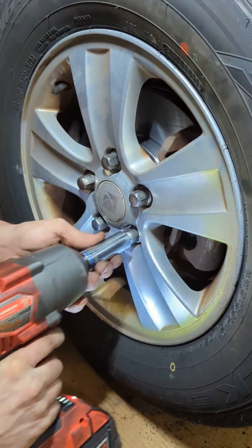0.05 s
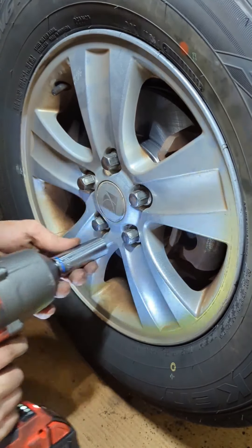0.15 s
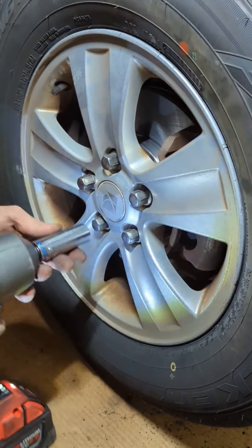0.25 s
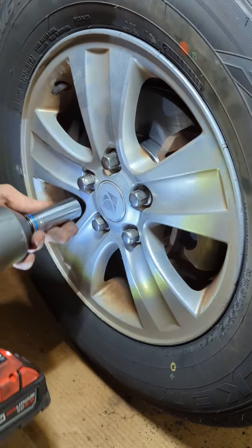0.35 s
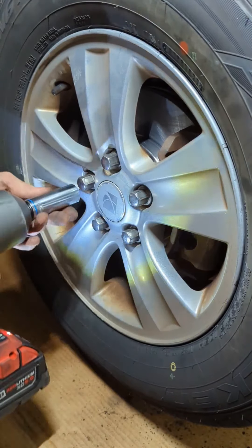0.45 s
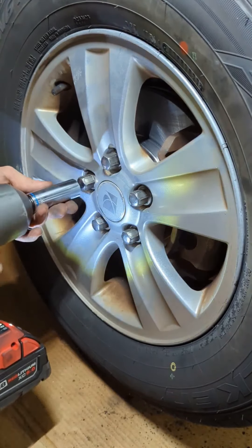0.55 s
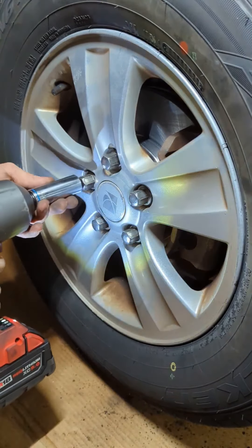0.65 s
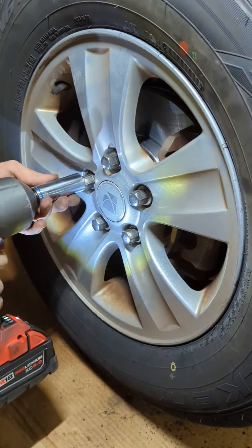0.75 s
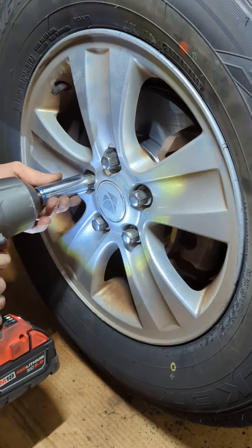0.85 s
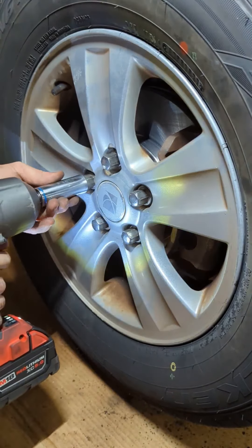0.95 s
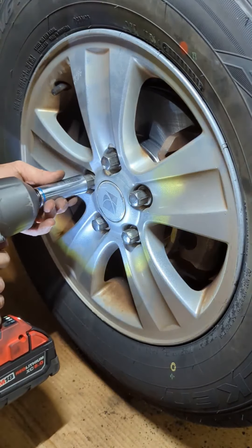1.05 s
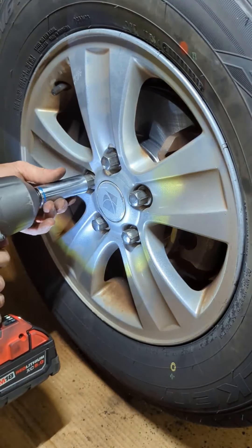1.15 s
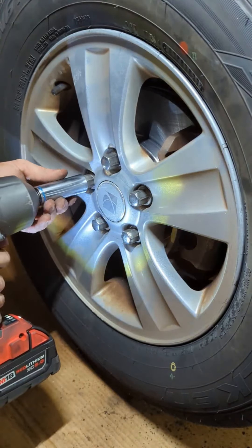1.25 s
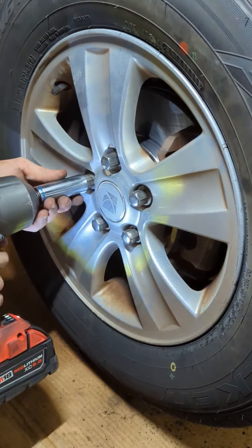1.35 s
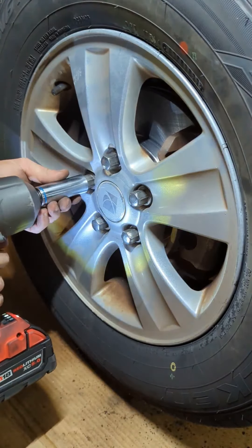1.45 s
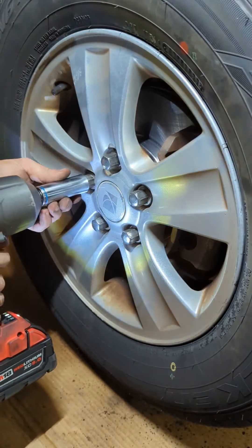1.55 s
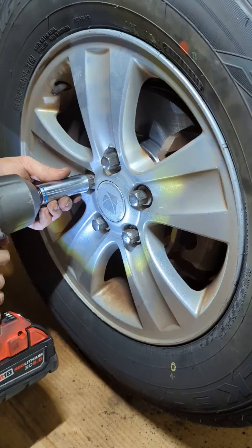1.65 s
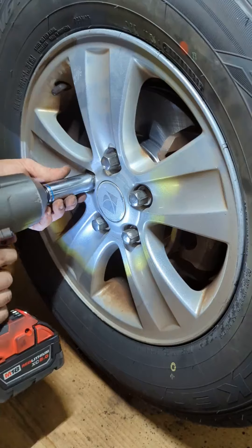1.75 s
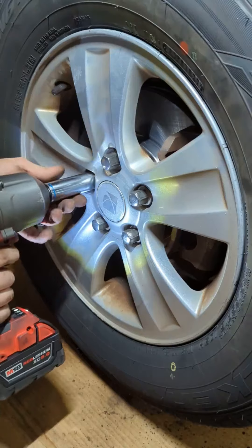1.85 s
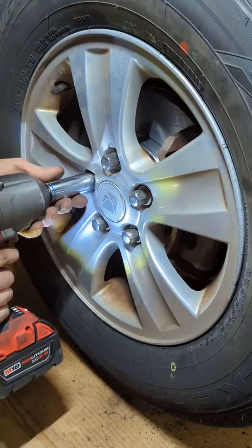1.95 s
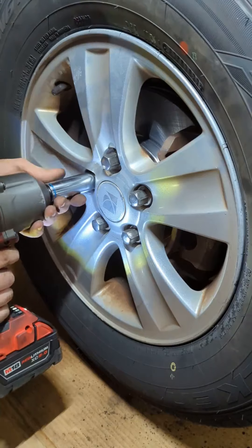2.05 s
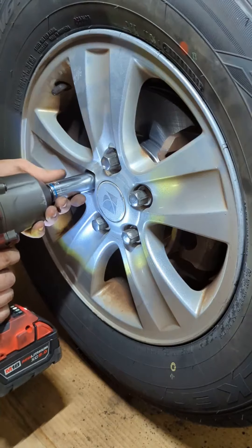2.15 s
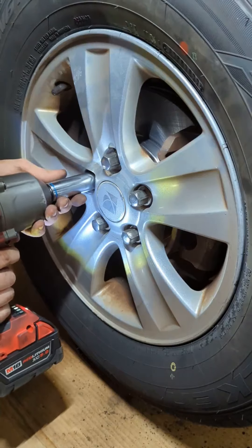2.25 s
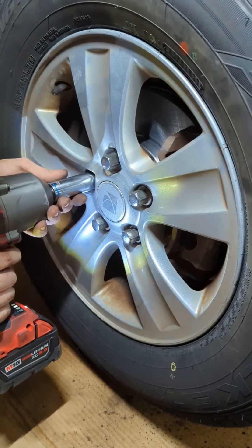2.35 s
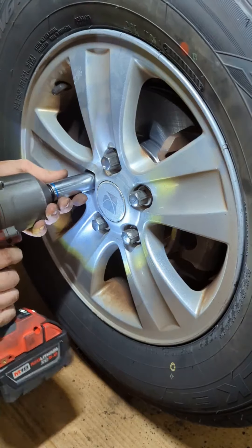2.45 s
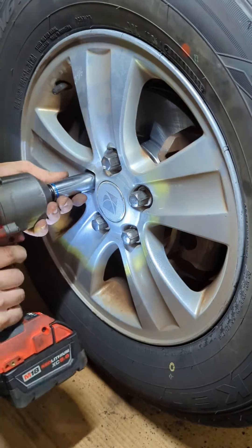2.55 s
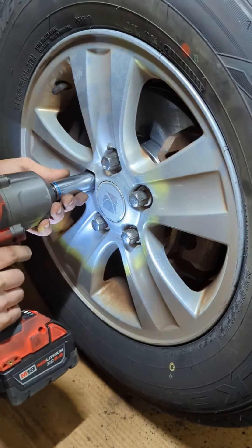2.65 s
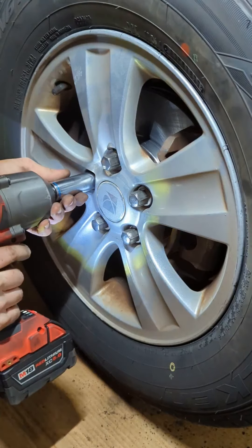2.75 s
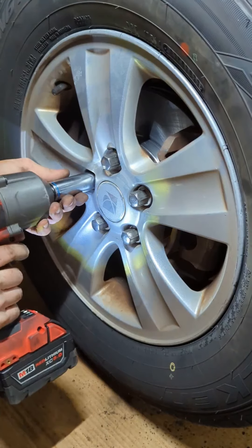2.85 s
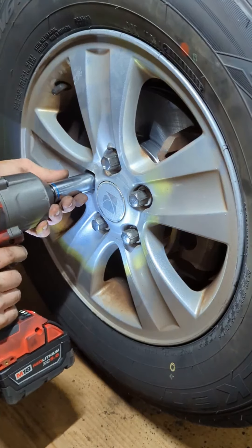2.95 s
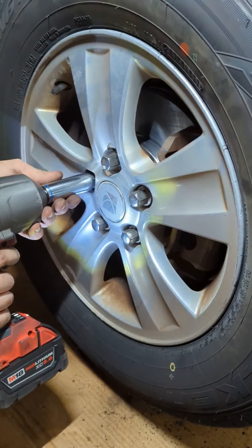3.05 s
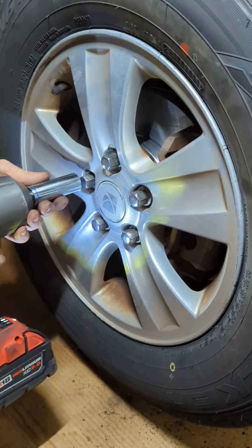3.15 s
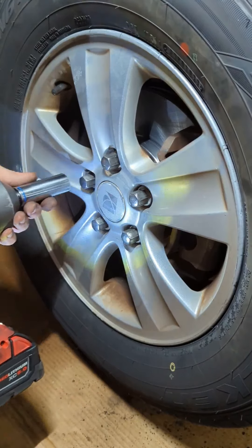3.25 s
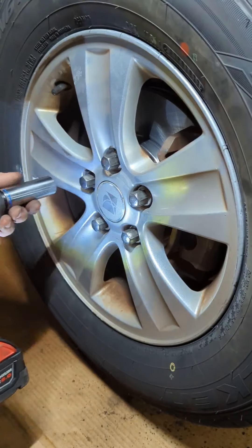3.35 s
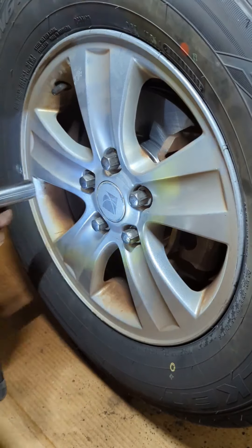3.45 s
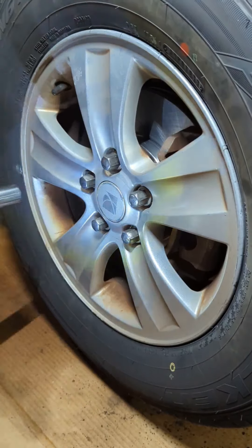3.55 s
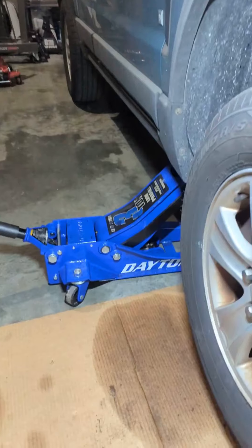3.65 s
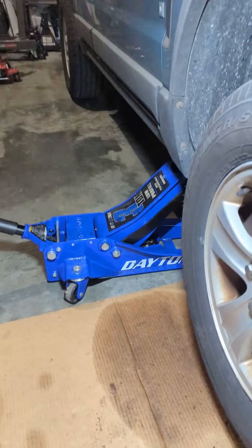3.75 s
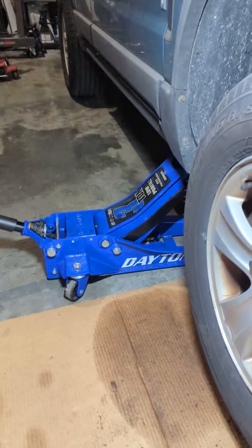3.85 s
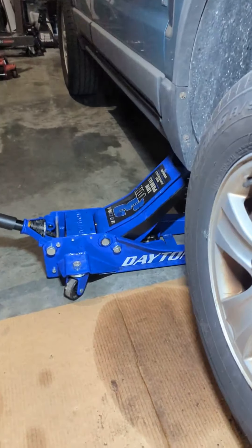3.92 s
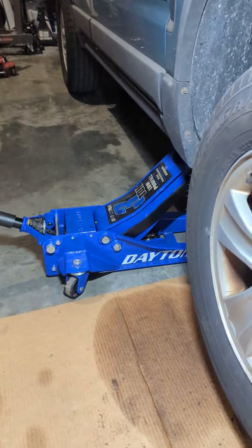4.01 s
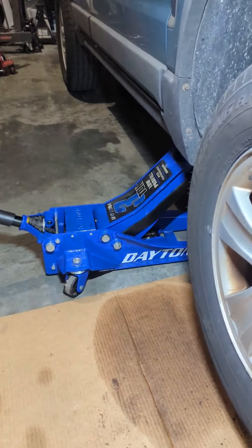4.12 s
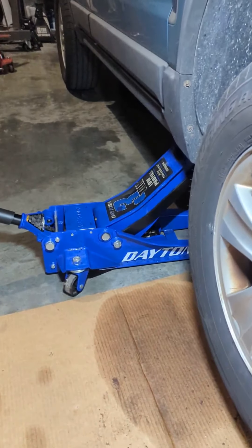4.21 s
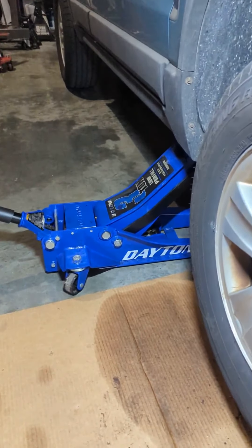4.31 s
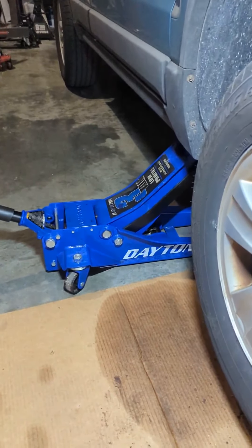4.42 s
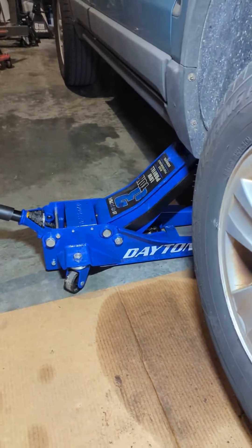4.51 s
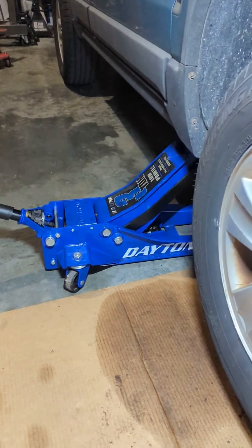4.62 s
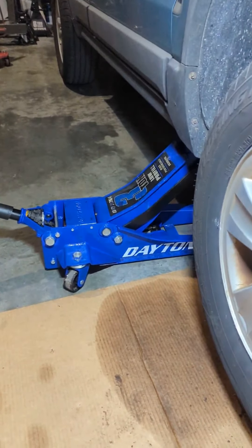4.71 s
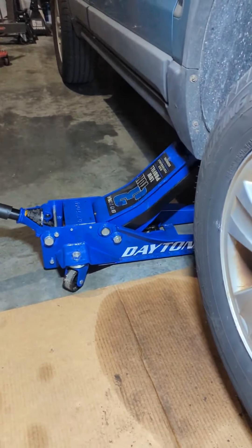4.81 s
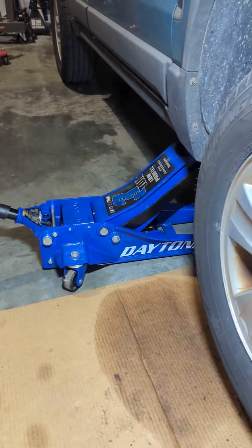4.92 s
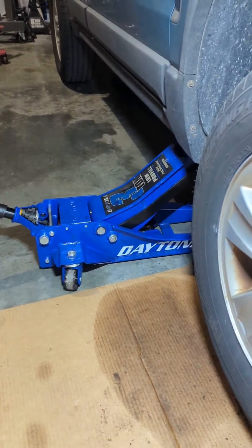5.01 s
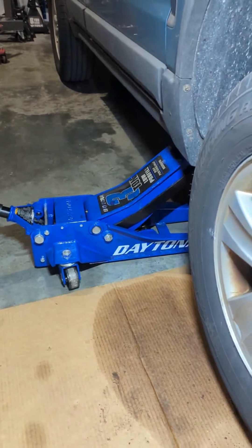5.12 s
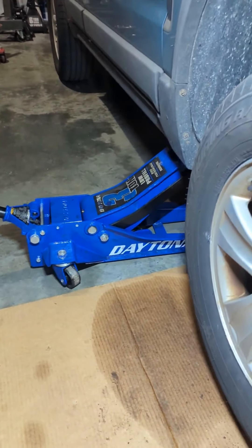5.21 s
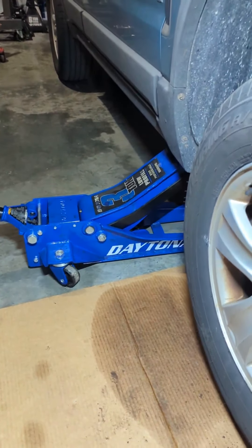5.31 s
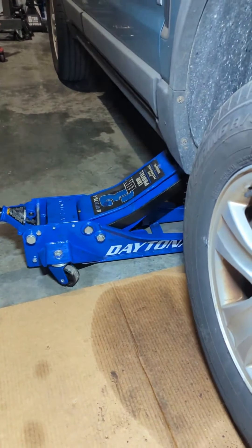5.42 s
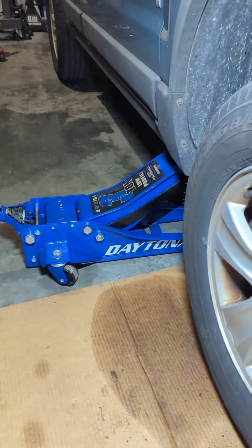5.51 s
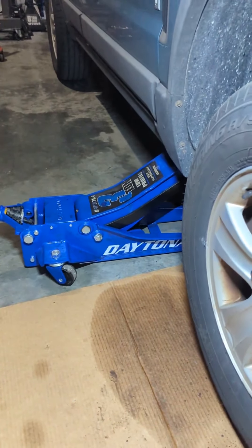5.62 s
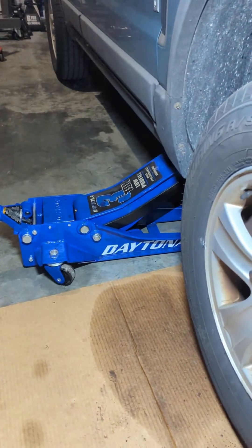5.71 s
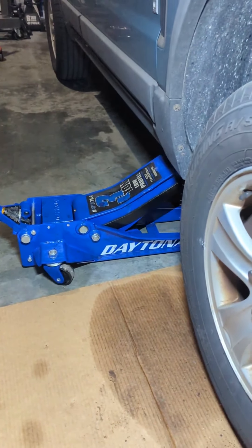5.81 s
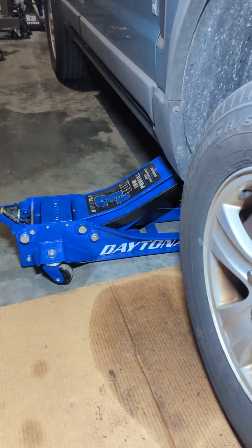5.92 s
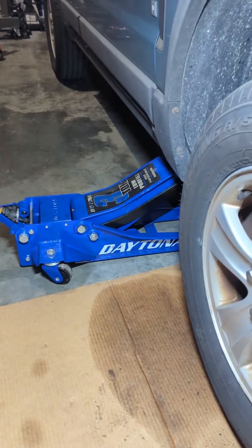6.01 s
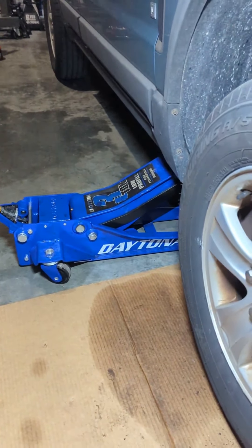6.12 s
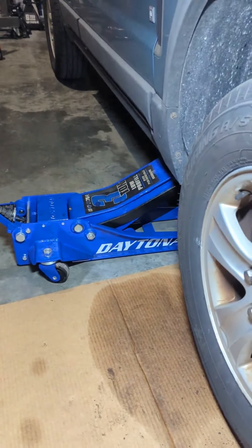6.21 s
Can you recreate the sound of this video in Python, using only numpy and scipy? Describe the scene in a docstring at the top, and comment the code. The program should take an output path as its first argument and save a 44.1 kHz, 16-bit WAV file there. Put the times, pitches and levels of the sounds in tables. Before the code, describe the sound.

Close up in an echoing garage, an impact wrench's rattle fades with socket ticks. After faint touches, a sharp click seats the socket; the motor creeps, whines up fast and brakes into a loud, rapid burst of hammering on the wheel. A muffled tap and a brief dropout follow, then a loud jack clank, a ringing handle knock, scraping and soft low tyre thuds over quiet rumble and hum.

```python
"""In a garage, on two microphones, an impact wrench dies away on one lug nut and is fitted to the next.
Its motor creeps, spins up whining as gear and magnet tones, and is braked; hammer blows ring the wheel.
A finger taps the microphone body, the level drops out briefly and a hollow tone sounds.
A floor jack is released with a hiss, a clank and a scrape, all noise bursts and ringing modes, and the
tyre lands with dull thuds. Rumble, mains hum and a narrow whirr, as noise and sines, run underneath."""
import sys
import numpy as np
from scipy import signal
from scipy.fft import rfft, irfft
from scipy.io import wavfile
from scipy.ndimage import uniform_filter1d

SR = 44100
rng = np.random.default_rng(int(sys.argv[2]) if len(sys.argv) > 2 else 0)


def to_wav(sig):
    """Store sig (one row per channel, or 1-D mono) as 16-bit WAV at the path in sys.argv[1].

    Samples outside -1..1 are clipped; the rate is SR.
    """
    pcm = np.clip(np.atleast_2d(sig), -1, 1) * 32767
    pcm = np.round(pcm).astype(np.int16)
    wavfile.write(sys.argv[1], SR, pcm.T)  # frames by channels


N = 276496
T = np.arange(N) / SR
HZ = np.maximum(np.fft.rfftfreq(N, 1 / SR), 1)

# level_db: dB level of each tone, band or event; some layers add a further gain.
# Gear tones locked to the tooth mesh: mesh_multiple, level_db
GEAR_ORDERS = [(2, -26.5), (5, 0.5), (6, -27.5), (7, -24), (10, -27)]
# Magnet and fan tones: mesh_multiple, slow_level_db, fast_level_db
FIELD_ORDERS = [(.9, -30, -14), (2.32, -22, -11), (3, -30, -1), (3.24, 0, 0), (4, -25, 0), (5.3, -30, -5),
                (5.7, -30, -6), (6.48, -25, -7), (7.22, -25, -9)]
# Switching tone and sidebands: carrier_hz, mesh_multiple_added, slow_level_db, fast_level_db
SWITCHING_TONES = [(8000, 0, -8, -14), (8000, -1.9, 0, -3), (8000, 1.9, -3, -1), (8000, .7, -9, -4),
                   (8000, -1.1, -8, -5), (16000, -4.9, -3, -22), (16000, -2.6, -10, -12)]
# Tool housing resonances, each passed twice: pitch_hz, width_per_pass_hz, level_db
HOUSING_MODES = [(2848, 274, 0), (1696, 500, -23), (4000, 520, -17), (6190, 1200, -25)]
# Spectrum of the gear hiss: pitch_hz, level_db
GEAR_HISS_COLOUR = [(88, -71), (150, -42), (937, -22.5), (1120, -17.5), (1470, -22.5), (1710, -18),
                    (2430, -25.5), (2790, -5), (3200, -20.5), (8640, -34.5), (15200, -43), (15900, -50.5)]
# Motor speed as gear mesh on a light trigger: time_s, mesh_hz
CREEP = [(1.975, 94), (2.08, 119.8), (2.15, 154.8), (2.262, 178.6)]
# Motor layers over speed: creep_level_db, top_level_db, lost_db, loss_time_s
# (after release the level changes by -lost_db in each loss_time_s; a negative quotient is a gain)
WHINE_LEVEL, FIELD_LEVEL = (-71.5, -33, 43, 0.5), (-50, -35.5, 17.5, 0.36)
HISS_LEVEL, SWITCHING_LEVEL = (-50, -24.5, -0.5, 0.3), (-50.5, -44.5, 2.5, -4.5)

# Hammer on anvil: start_s, level_db at 1-4 kHz, highs_level_db
HAMMER_BLOWS = [(2.5389, -5, -24.5), (2.5526, -5, -26.5), (2.5581, -11.5, -17.5), (2.5696, -11.5, -11.5),
                (2.582, -16, -20), (2.594, -11.5, -14), (2.6204, -5.5, -18.5), (2.634, -7, -21.5),
                (2.6445, -11.5, -23), (2.6625, -11.5, -16), (2.6742, -9, -11.5), (2.6947, -7, -15.5),
                (2.7127, -4, -15.5), (2.7287, -12, -17), (2.751, -10.5, -15.5), (2.7756, -13.5, -15.5),
                (2.8, -9, -19.5), (2.82, -16, -22.5), (2.8484, -16.5, -26.5), (2.876, -18, -29.5)]
# Socket on nut: start_s, level_db at 1-4 kHz, lows_level_db, highs_level_db
SOCKET_TOUCHES = [(0.197, -25.5, -67, -43), (0.2173, -22, -56, -32), (0.2319, -24.5, -60, -30),
                  (0.2522, -27, -67, -34), (0.2875, -27.5, -67, -34.5), (0.3058, -26, -67, -39),
                  (0.3603, -37, -54, -66), (0.3741, -39, -58, -67), (0.8701, -38, -33.5, -51),
                  (0.9348, -38.5, -37, -58), (1.2313, -41.5, -37.5, -52), (1.476, -45, -57, -57),
                  (1.6837, -45, -63, -59.5), (1.7573, -55, -61, -51), (1.7864, -33, -63.5, -42),
                  (1.8776, -27, -32.5, -37), (2.02, -39, -50.5, -45), (2.1215, -12.5, -30, -11),
                  (3.1373, -41, -62, -64), (3.1696, -44, -42, -65), (3.4697, -50, -52, -54),
                  (3.5144, -49, -56, -54)]
# Spectrum of a blow on the wheel: pitch_hz, level_db
WHEEL_CRACK_COLOUR = [(35, -48), (60, -23.5), (150, -24), (293, -15), (467, -3.5), (919, -10.5),
                      (1010, -7.5), (2080, 2.5), (2230, -3.5), (4920, -2), (6220, -3.5), (11100, -17),
                      (14700, -15), (15800, -42.5)]
# Ringing of the wheel: pitch_hz, level_db, t60_s
WHEEL_MODES = [(470, -8, .09), (990, -9, .08), (1300, -3, .05), (1560, 0, .05), (1700, -3, .05),
               (1930, -2, .05), (2080, -3, .06), (2380, -4, .05), (2680, -3, .04), (3430, -4, .04),
               (4480, -3, .03), (5400, -6, .025), (6150, -6, .025), (6890, -7, .025)]

# Floor jack and its handle: start_s, level_db at 1-4 kHz, lows_level_db, highs_level_db
JACK_CLANKS, HANDLE_CLANKS = [(4.6137, -51, -77.5, -47.5), (4.7863, -58, -41, -46.5),
                              (4.845, -47, -54, -60), (4.8668, -12.5, -27.5, -14), (5.3946, -51, -68, -32),
                              (5.4245, -38.5, -60, -54), (5.96, -51, -60, -49), (6.0974, -68, -51, -45),
                              (6.1525, -50, -51, -51), (6.186, -52, -67, -43)], [(5.0924, -23.5, -35, -38), (5.1394, -33.5, -41, -61),
                                            (5.1697, -38, -42, -52)]
# Spectrum of a clank: pitch_hz, level_db
JACK_CRACK_COLOUR = [(35, -45), (156, 4), (314, -12.5), (501, 4.5), (650, -4), (1270, -2), (2000, -1.5),
                     (2950, -4.5), (3720, -22.5), (4550, -11), (5100, -21.5), (5930, -15), (6990, -33.5),
                     (8820, -33), (15800, -82)]
# Ringing of the jack and of its handle: pitch_hz, level_db, t60_s
JACK_MODES, HANDLE_MODES = [(913, -6, .15), (1260, -5, .16), (1722, -4, .09), (2200, -5, .1),
                            (2650, -3, .09), (2810, -2, .1), (2920, 0, .1), (3200, -2, .1), (3420, -4, .12),
                            (4450, -8, .12), (4600, -6, .12)], [(1740, -15, 0.17), (1733, -2, 0.27), (1940, 1, 0.072),
                                                (2110, 1.5, .13), (2300, -15, 0.1), (5850, -11, 0.028)]
# Tyre landing and bouncing: start_s, level_db at 1-4 kHz, lows_level_db, highs_level_db
TYRE_THUDS = [(5.47, -54, -41, -62), (5.495, -52, -44, -60), (5.5211, -28.5, -23, -44),
              (5.5602, -21, -26.5, -32), (5.639, -34, -38.5, -38)]
# Spectrum of a thud: pitch_hz, level_db
TYRE_CRACK_COLOUR = [(35, -51), (60, -40), (180, -25), (249, -6), (361, -12), (467, 0.5), (590, -9),
                     (985, -12), (1080, -20), (1720, -11), (1890, -18), (3390, -24), (15800, -51)]
# Ringing of the tyre: pitch_hz, level_db, t60_s
TYRE_MODES = [(220.4, -4, 0.25), (267, -2, 0.21), (416, -14, 0.32), (472, -8, 0.18), (536, -11.5, 0.34),
              (650, -9.5, 0.3)]

# Spells of loose anvil and socket, of sliding and shuffling, and of the jack's release valve:
# start_s, attack_s, hold_s, level_db, sag_db_per_s while held, release_db_per_s
RATTLE_SPELLS, SCRAPE_SPELLS, VALVE_SPELLS = [(0, 0.00067, 0.32, -25.5, 82, 190),
                                              (2.53, 0.0067, 0.0078, -18.5, 301, 2200),
                                              (2.564, .055, 0.13, -19, 3, 140.5),
                                              (2.95, 0.068, 0.17, -59.5, -9, 150)], [(3.38, 0.19, 0.071, -59, 1.4, 110),
                                                              (5.349, 0.012, 0.071, -42.5, 1.5, 171),
                                                              (5.45, 0.14, 0.23, -47.5, 17, 220),
                                                              (5.87, 0.062, 0.19, -66.5, 1.4, 100),
                                                              (6.17, .02, .1, -54, 22, 100)], [(4.772, 0.012, .08, -54.5, -72, 437)]
# Spectra of rattle and scrape: pitch_hz, level_db
RATTLE_COLOUR, SCRAPE_COLOUR = [(24, -48), (64, -17.5), (225, -17.5), (513, -4.5), (912, -6.5), (1600, 2),
                                (2050, 5), (2500, 0), (4500, -6), (6100, -11), (9100, -22.5), (12500, -31),
                                (15400, -27), (15900, -45.5)], [(180, -54), (300, -4), (563, -15), (825, -2.5),
                                                       (896, -9), (1550, 0), (1710, -0.5), (2550, 1),
                                                       (6240, -5), (15000, -27), (15900, -30)]

# Finger tap on the microphone body, and a brief hollow tone: start_s, level_db
MIC_TAP, HOLLOW_TONE = [(3.576, -33.5)], [(3.652, -47)]
# Their ringing: pitch_hz, level_db, t60_s
MIC_TAP_MODES, HOLLOW_MODES = [(120, 7.5, 0.032), (502, -18, 0.006), (853, 11.5, 0.011), (1230, 8, 0.01),
                               (2000, 9.5, 0.0064), (2900, -5, 0.0033)], [(610, -10, 1), (553, -3, 0.3)]

# Garage air: time_s, rumble_level_db, middle_level_db, treble_level_db
AIR_LEVELS = [(0, -58.5, -52.5, -76), (.7, -67, -63.5, -73), (1.8, -67.5, -62.5, -72.5),
              (3.1, -59, -60, -79.5), (3.6, -60, -60, -70), (3.72, -60, -62, -75), (4, -60.5, -64.5, -88),
              (4.5, -59.5, -64, -85), (5.2, -57.5, -56, -69), (5.9, -56.5, -58, -75),
              (6.27, -53.5, -62.5, -70)]
# Spectrum of the air: pitch_hz, level_db
AIR_COLOUR = [(15, -41), (30, -14), (60, 2), (120, -4.5), (180, 3), (270, -10.5), (400, 0), (600, -12),
              (850, -8.5), (1250, -10.5), (2800, -18), (6000, -30.5), (10000, -41), (11400, -43.5),
              (12000, -36), (12800, -41.5), (15000, -46), (15800, -53.5)]
# Mains and fan tones: pitch_hz, level_db over the rumble
HUM_TONES = [(120, -5), (240, -11.5), (842, -8)]
# Echo decay of the garage: pitch_hz, t60_s
GARAGE_T60 = [(100, 0.7), (500, .7), (2000, 0.78), (6000, 0.47), (15000, 0.38)]
# Likeness of the two microphones: pitch_hz, likeness (0 to 1)
LIKENESS = [(60, 0.94), (130, 0.85), (290, 0.98), (640, 0.18), (1410, 0.06), (3100, 0.08), (6820, 0.027),
            (15000, 0.089)]
# Difference in microphone colour: pitch_hz, left_minus_right_db
MIC_COLOURS = [(60, -2), (130, 1), (290, 1), (640, 0.5), (1410, -2.0), (3100, 3), (6820, -14), (15000, 1.5)]
# Brief dips in level: start_s, deepest_s, end_s, depth_db
DIPS = [(2.562, 2.565, 2.569, -11), (3.608, 3.637, 3.653, -46)]

# Motor speed: full trigger spins it up, release brakes it; the motor fades out after STOP_S
TOP_HZ, SPIN_UP_S = 553, .058
RELEASE_S, BRAKE_DROP_HZ, BRAKE_DROP_S, COAST_HZ_PER_S, STOP_S = 2.486, 28.9, .008, 850, 2.565
START_S, BRAKE_GRIP_S, STOP_FADE_S = .045, .014, .012
# The whine swells as it meets a housing resonance
WHINE_PEAK_HZ, WHINE_PEAK_HALF_WIDTH_HZ, WHINE_PEAK_DB = 549.2, 17, 19.5
FIELD_CREEP_DB = -72.5   # the magnet tones vanish at the lowest speeds
# Buzz follows the force on the teeth; push is per 1000 Hz/s of speeding up, less at low speed
BUZZ_CREEP_DB, BUZZ_TOP_DB, BUZZ_PUSH_DB, BUZZ_BRAKE_DB = -39, -40.5, -24, -21
KICK_DB, KICK_S = -40.5, .07   # extra buzz as the rotor breaks loose
# Decays of the 1-4 kHz band; the other bands stretch them
HAMMER_T60_S, TICK_T60_S, KNOCK_T60_S = .035, .055, .095
JACK_T60_S, HANDLE_T60_S, TYRE_T60_S = .18, .095, .3
HAMMER_LOWS_DB, TICK_LOWS_DB = -19.5, -20.5   # lows against the 1-4 kHz level
KNOCK_RING_DB = 7.5   # extra wheel ringing of a full knock
VALVE_HZ, VALVE_WIDTH_PER_PASS_HZ = 5800, 750
AIR_SPLIT_HZ, AIR_TREBLE_HZ = 700, 4000
MIC_LOW_CUT_HZ, CUTOFF_HZ = 50, 16600


def motor():
    """Gear and magnet tones on the speed, a rough pulse per tooth into the housing, hiss and whistles."""
    mesh, whine_db, field_db, buzz_db, hiss_db, switch_db, running, braked = motor_state()
    turns = np.cumsum(mesh) / SR   # teeth passed
    speed = np.clip((mesh - 170) / 300, 0, 1)
    gear = sum(amp(db) * np.sin(2 * np.pi * k * turns + k * k) * flicker(30, .6)
               for k, db in GEAR_ORDERS)
    field = sum(amp(slow_db + speed * (fast_db - slow_db)) * np.sin(2 * np.pi * k * turns) * flicker(50, 3.0)
                for k, slow_db, fast_db in FIELD_ORDERS)
    buzz = tooth_buzz(mesh, turns, braked)
    whistle = switching_whistle(turns, speed)
    tones = np.sqrt(2) * (amp(whine_db) * gear + amp(field_db) * field + amp(switch_db) * whistle)
    tones = tones + amp(buzz_db) * buzz
    pair = np.stack([tones, np.roll(tones, 3)])   # the tool is a little nearer the left microphone
    return running * (pair + amp(hiss_db) * stereo_noise(GEAR_HISS_COLOUR))


def tooth_buzz(mesh, turns, braked):
    """One pulse per tooth plus noise shakes the housing resonances; braked teeth only chatter."""
    pulses = np.diff(np.floor(turns), prepend=0) * np.sqrt(SR / mesh)
    pulses = pulses * flicker(100, 1.6) * (1 - braked)
    chatter = (0.7 + 0.52 * braked * flicker(110, 4.0)) * rng.standard_normal(N)
    teeth = pulses + chatter
    return rms_one(sum(amp(db) * resonance(resonance(teeth, hz, width), hz, width)
                       for hz, width, db in HOUSING_MODES))


def switching_whistle(turns, speed):
    """Motor switching whistles at its carriers with sidebands set by the mesh, and also hisses."""
    tones = sum(amp(slow_db + speed * (fast_db - slow_db))
                * np.sin(2 * np.pi * (hz * T + k * turns)) * flicker(60, 3.0)
                for hz, k, slow_db, fast_db in SWITCHING_TONES)
    return tones + amp(-4.0) * rms_one(resonance(rng.standard_normal(N), 8000, 1200))


def motor_state():
    """Gear mesh in Hz and the levels in dB that follow from speed, force and release."""
    (start, _), (full, creep_hz) = CREEP[0], CREEP[-1]
    after = np.clip(T - RELEASE_S, 0, STOP_S - RELEASE_S + STOP_FADE_S)   # seconds since release
    spin_up = np.tanh(np.maximum(T - full, 0) / SPIN_UP_S)
    mesh = np.interp(T, *np.transpose(CREEP)) + (TOP_HZ - creep_hz) * spin_up
    mesh = mesh - BRAKE_DROP_HZ * (1 - np.exp(-after / BRAKE_DROP_S)) - COAST_HZ_PER_S * after
    # 0 at the end of the creep, 1 at top speed
    fast = np.clip(np.log(mesh / creep_hz) / np.log(TOP_HZ / creep_hz), -1, 1)
    above_creep = np.maximum(fast, 0)
    whine, field, hiss, switch = [
        slow + (top - slow) * above_creep - lost * np.minimum(after / s, 1)
        for slow, top, lost, s in (WHINE_LEVEL, FIELD_LEVEL, HISS_LEVEL, SWITCHING_LEVEL)]
    whine = whine + WHINE_PEAK_DB / (1 + ((mesh - WHINE_PEAK_HZ) / WHINE_PEAK_HALF_WIDTH_HZ) ** 2)
    field = field + FIELD_CREEP_DB * np.minimum(fast, 0) ** 2
    push = uniform_filter1d(np.gradient(mesh) * SR / 1000, size=SR // 40)
    braked = np.minimum(after / BRAKE_GRIP_S, 1)
    buzz = amp(BUZZ_CREEP_DB + (BUZZ_TOP_DB - BUZZ_CREEP_DB) * above_creep)
    buzz = buzz + amp(BUZZ_PUSH_DB) * np.maximum(push, 0) * (mesh / TOP_HZ) ** 2
    buzz = buzz + amp(BUZZ_BRAKE_DB) * braked
    buzz = buzz + amp(KICK_DB) * np.exp(-np.maximum(T - start - START_S, 0) / KICK_S)
    fade = np.minimum((T - start) / START_S, 1 + (STOP_S - T) / STOP_FADE_S)
    running = np.clip(fade, 0, 1) ** 2
    return mesh, whine, field, 20 * np.log10(buzz), hiss, switch, running, braked


def hammer():
    """Hammer on anvil: short noise cracks that also ring the wheel."""
    blows = [(s, db, db + HAMMER_LOWS_DB, high_db) for s, db, high_db in HAMMER_BLOWS]
    crack = cracks(blows, HAMMER_T60_S, WHEEL_CRACK_COLOUR, 3.7, 1.0, snap_db=4.5)
    return amp(1.5) * crack + struck(HAMMER_BLOWS, WHEEL_MODES, -22.0, scatter_db=7.5)


def socket():
    """Socket on nut: the more lows a touch has, the longer it sounds and the more it rings the wheel."""
    s, db, low_db, high_db = np.transpose(SOCKET_TOUCHES)
    knock = np.clip(1 - (low_db - db) / TICK_LOWS_DB, 0, 1)   # 0 is a tick, 1 a full knock
    t60s = TICK_T60_S + (KNOCK_T60_S - TICK_T60_S) * knock
    crack = cracks(SOCKET_TOUCHES, t60s, WHEEL_CRACK_COLOUR, 1.8, 0.66, snap_db=0.5)
    return crack + struck(np.c_[s, db + KNOCK_RING_DB * knock], WHEEL_MODES, -22, scatter_db=5.5)


def jack():
    """Clanks of the jack and its handle: noise cracks, each part with its own ringing modes."""
    t60s = [JACK_T60_S] * len(JACK_CLANKS) + [HANDLE_T60_S] * len(HANDLE_CLANKS)
    clanks = cracks(JACK_CLANKS + HANDLE_CLANKS, t60s, JACK_CRACK_COLOUR, 2.33, 0.78, snap_db=-2.0)
    body = struck(JACK_CLANKS, JACK_MODES, -15.5, scatter_db=2.0)
    handle = struck(HANDLE_CLANKS, HANDLE_MODES, -18.5, scatter_db=6.0)
    return clanks + body + handle


def tyre():
    """The tyre lands and bounces: dull cracks over low modes rung by the lows of each thud."""
    thuds = [(s, low_db) for s, mid_db, low_db, high_db in TYRE_THUDS]
    crack = cracks(TYRE_THUDS, TYRE_T60_S, TYRE_CRACK_COLOUR, 1.74, 0.66, snap_db=-6.0)
    return crack + struck(thuds, TYRE_MODES, -4.5, scatter_db=1)


def rattle():
    """Loose anvil and socket: flickering coloured noise."""
    return spells(RATTLE_SPELLS) * flicker(120, 2.5) * stereo_noise(RATTLE_COLOUR)


def scrape():
    """Sliding and shuffling: flickering coloured noise."""
    return spells(SCRAPE_SPELLS) * flicker(90, 1.54) * stereo_noise(SCRAPE_COLOUR)


def valve():
    """Release valve hiss: noise through two equal resonances."""
    hiss = rng.standard_normal((2, N))
    for _ in range(2):
        hiss = resonance(hiss, VALVE_HZ, VALVE_WIDTH_PER_PASS_HZ)
    return spells(VALVE_SPELLS) * rms_one(hiss)


def microphone_tap():
    """A finger tap rings the microphone body."""
    return struck(MIC_TAP, MIC_TAP_MODES, -10.0, 0.64)


def hollow_tone():
    """A brief hollow tone of two dying modes."""
    return struck(HOLLOW_TONE, HOLLOW_MODES, -1.5, 0.67)


def air():
    """Garage air: rumble, hiss and faint treble as noise bands, with wavering hum and whirr as sines."""
    s, rumble_db, hiss_db, treble_db = np.transpose(AIR_LEVELS)
    rumble_gain = level([np.c_[s, rumble_db]])
    rumble = rumble_gain * flicker(14.0, 0.98) * stereo_noise(AIR_COLOUR, high_hz=AIR_SPLIT_HZ)
    hiss = level([np.c_[s, hiss_db]]) * flicker(16, 0.67)
    hiss = hiss * stereo_noise(AIR_COLOUR, low_hz=AIR_SPLIT_HZ, high_hz=AIR_TREBLE_HZ)
    treble = level([np.c_[s, treble_db]]) * stereo_noise(AIR_COLOUR, low_hz=AIR_TREBLE_HZ)
    hum = sum(amp(db) * flicker(3.6, 0.83) * np.sqrt(2) * np.sin(2 * np.pi * hz * T)
              for hz, db in HUM_TONES)
    return rumble + hiss + treble + rumble_gain * hum


def garage(x):
    """Echo tail: third-octave noise dying at its own rate, alike in both channels only in the bass."""
    t, tail = T[:SR], 0
    for hz in 60 * 2 ** np.arange(0, 8, 1 / 3):
        mid, side = resonance(rng.standard_normal((2, SR)), hz, hz / 4)
        band = rms_one(microphone_pair(mid, side, hz))
        tail = tail + band * np.sqrt(hz) * amp(-60 * t / at_hz(GARAGE_T60, hz))
    tail = tail * (1 - np.exp(-t / 0.0058))   # the echo builds up
    return signal.fftconvolve(x, tail / np.sqrt(np.sum(tail ** 2) / 2), axes=1)[:, :N]


def struck(events, modes, ring_db, scatter_db):
    """Every blow strikes every mode, with its own strength at each microphone."""
    at, out = [round(e[0] * SR) for e in events], np.zeros((2, N))
    luck = rng.normal(0, 1, (len(at), len(modes), 2))
    for k, (hz, db, t60) in enumerate(modes):
        clicks = np.full((2, N), 1e-18)
        clicks[:, at] = amp(np.array(events)[:, 1] + db + ring_db + scatter_db * luck[:, k].T)
        r, w = amp(-60 / (t60 * SR)), 2 * np.pi * hz / SR
        out += signal.lfilter([0, np.sin(w)], [1, -2 * r * np.cos(w), r * r], clicks)
    return out


def cracks(events, t60s, spectrum, low_stretch, high_stretch, snap_db):
    """Noise bursts in three bands, a short snap over a tail; each stretch scales its band's rise and decay."""
    out = np.zeros((2, N))
    bands = [(1, 1000, 4000, 1), (2, 1, 1000, low_stretch), (3, 4000, 1e5, high_stretch)]
    for column, low_hz, high_hz, stretch in bands:
        shape = np.zeros(N)
        for e, t60 in zip(events, np.broadcast_to(t60s, len(events))):
            i = round(e[0] * SR)
            t = T[:min(N - i, SR // 2)]
            rise = 1 - np.exp(-t / (0.001 * stretch))
            tail = amp(-60 * t / (t60 * stretch))
            snap = amp(snap_db) * np.exp(-t / (0.0027 * stretch))
            shape[i:i + len(t)] += rise * amp(e[column] - 9.0) * (tail + snap)
        noise = stereo_noise(spectrum, low_hz=low_hz, high_hz=high_hz)
        # even out the noise so each crack has a steady strength
        power = uniform_filter1d(noise ** 2, size=round(4 * SR / max(low_hz, 300)))
        out += shape * noise / np.sqrt(power + .05)
    return out


def spells(rows):
    """Gain in time: each spell rises, sags while held and is released."""
    out = 0
    for start, attack, hold, db, sag, release in rows:
        t = T - start - attack
        fall_db = sag * np.clip(t, 0, hold) + release * np.clip(t - hold, 0, 3)
        out = out + np.clip(1 + t / attack, 0, 1) * amp(db - fall_db)
    return out


def stereo_noise(spectrum, low_hz=0.99, high_hz=97800.0):
    """Coloured noise pair with the likeness of the two microphones; rms 1."""
    mid, side = rfft(rng.standard_normal((2, N)))
    edges = 1 / np.sqrt((1 + (low_hz / HZ) ** 6) * (1 + (HZ / high_hz) ** 6))
    pair = microphone_pair(mid, side, HZ)
    return rms_one(irfft(pair * amp(at_hz(spectrum, HZ)) * edges, N))


def microphone_pair(mid, side, hz):
    """Mix shared and opposed noise to the likeness of the two microphones."""
    alike = np.clip(at_hz(LIKENESS, hz), 0, 1)
    return np.sqrt(1 + alike) * mid + np.sqrt(1 - alike) * side * [[1], [-1]]


def flicker(rate_hz, depth_db):
    """Random gain: noise smoothed by a one-pole low-pass at rate_hz, with an rms swing of depth_db."""
    knots = rng.standard_normal(int(N / SR * 400) + 2)   # 400 a second
    slow = signal.lfilter([1], [1, -np.exp(-2 * np.pi * rate_hz / 400)], knots)
    return amp(depth_db * np.interp(T * 400, np.arange(len(knots)), rms_one(slow)))


def resonance(x, hz, width_hz):
    """Two-pole band-pass with gain about 1 on top."""
    r = np.exp(-np.pi * width_hz / SR)
    feedback = [1, -2 * r * np.cos(2 * np.pi * hz / SR), r * r]
    return signal.lfilter([(1 - r * r) / 2, 0, (r * r - 1) / 2], feedback, x)


def level(tables):
    """Gain in time from dB curves, silent outside them."""
    return sum(amp(np.interp(T, *np.transpose(rows), left=-200, right=-200)) for rows in tables)


def at_hz(points, hz):
    """Read a spectrum table on a log frequency axis."""
    return np.interp(np.log(hz), np.log(np.array(points)[:, 0]), np.array(points)[:, 1])


def rms_one(x):
    """Scale to rms 1."""
    return x / np.sqrt(np.mean(x ** 2) + 1e-20)


def amp(db):
    """dB to gain."""
    return 10 ** (np.asarray(db) / 20)


def scene():
    """All sources at the microphones; wrench, jack and tyre also feed the garage echo."""
    spin, blows, lift = motor(), hammer() + socket(), jack() + tyre()
    echo = garage(amp(-16.0) * spin + amp(-11.5) * blows + amp(-9) * lift)
    rubbing = rattle() + scrape() + valve()
    return spin + blows + lift + echo + rubbing + microphone_tap() + hollow_tone() + air()


def record(dry):
    """Microphone colours and low cut, brief dips in level, rounded peaks and the top cut."""
    tilt = at_hz(MIC_COLOURS, HZ) / 2 * np.array([[1], [-1]])
    low_cut = 1 / np.sqrt(1 + (MIC_LOW_CUT_HZ / HZ) ** 4)
    coloured = irfft(rfft(dry) * amp(tilt) * low_cut, N)
    dip_db = sum(np.interp(T, [start, deepest, end], [0, depth_db, 0])
                 for start, deepest, end, depth_db in DIPS)
    rounded = np.tanh(coloured * amp(dip_db))
    return signal.sosfilt(signal.cheby2(12, 70, CUTOFF_HZ, fs=SR, output="sos"), rounded)


dry = scene()
out = record(dry)
to_wav(out)
```